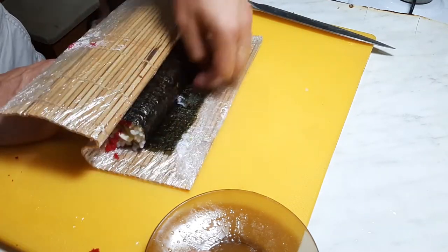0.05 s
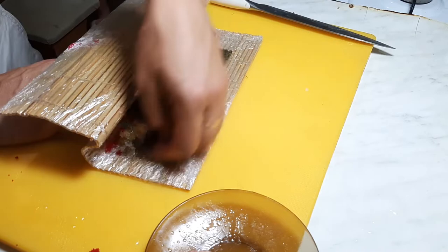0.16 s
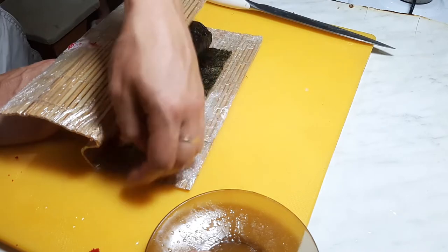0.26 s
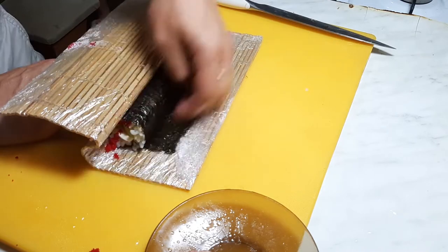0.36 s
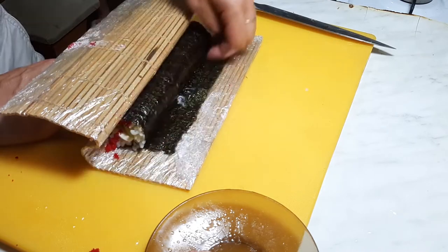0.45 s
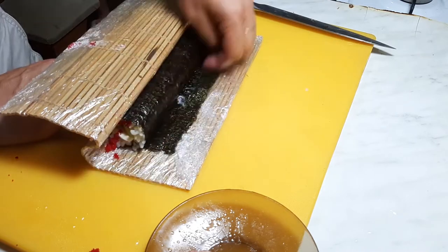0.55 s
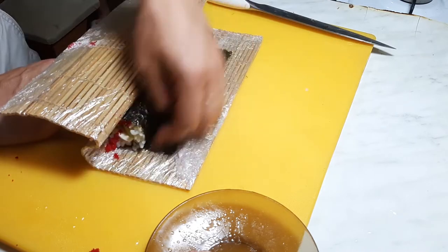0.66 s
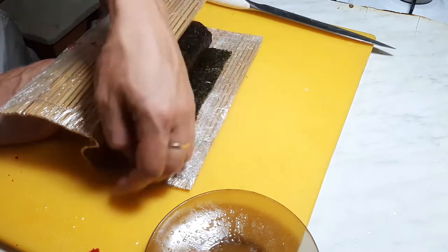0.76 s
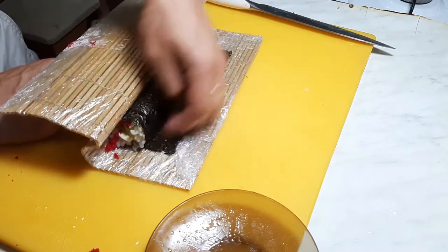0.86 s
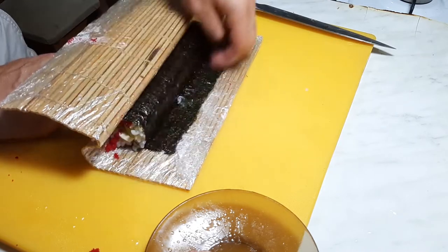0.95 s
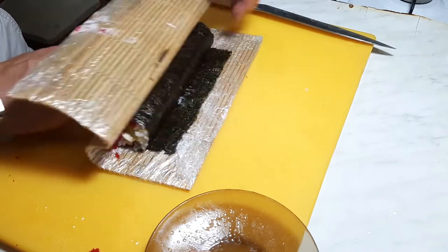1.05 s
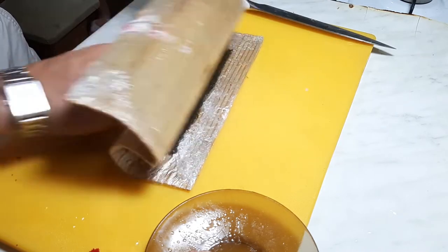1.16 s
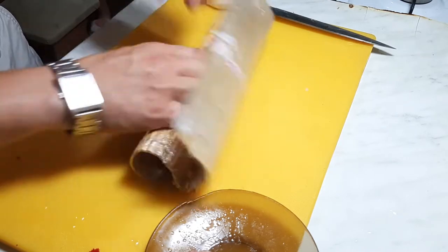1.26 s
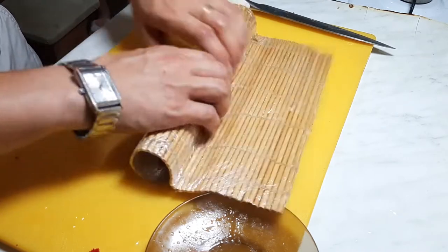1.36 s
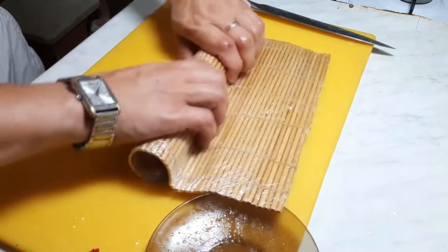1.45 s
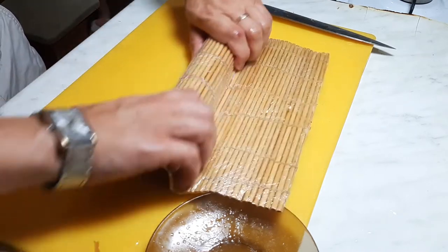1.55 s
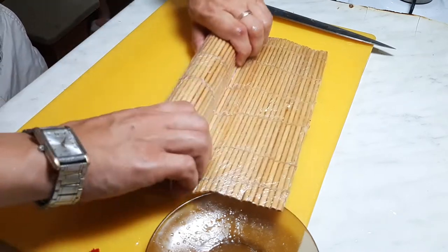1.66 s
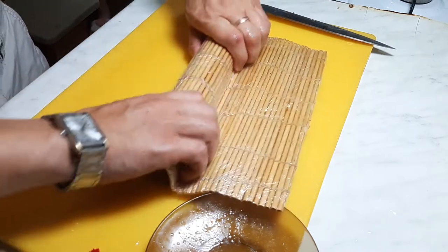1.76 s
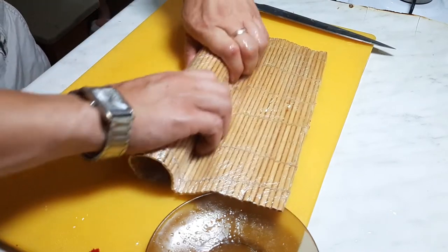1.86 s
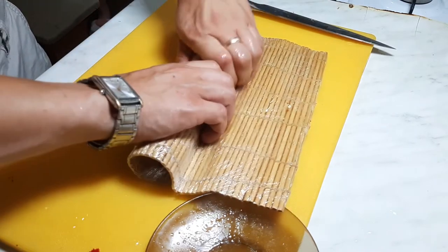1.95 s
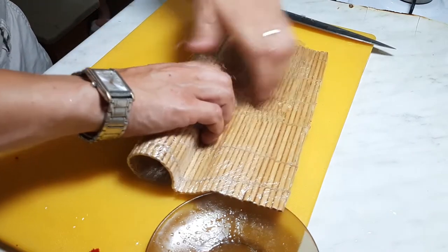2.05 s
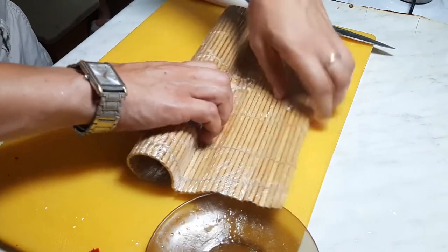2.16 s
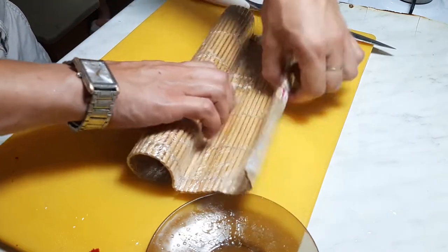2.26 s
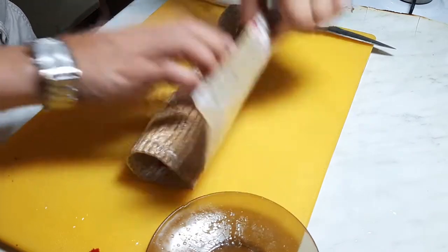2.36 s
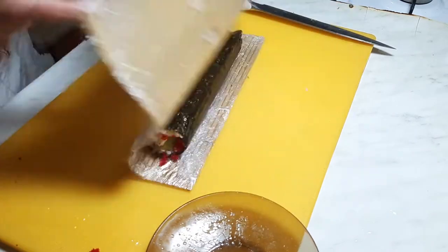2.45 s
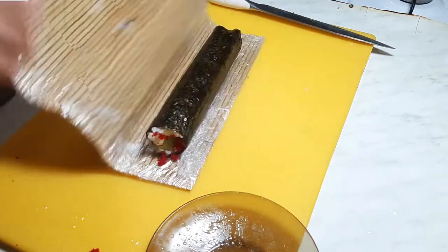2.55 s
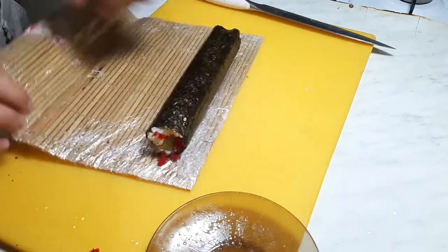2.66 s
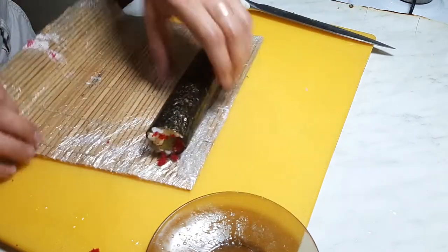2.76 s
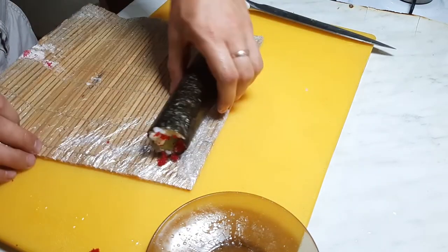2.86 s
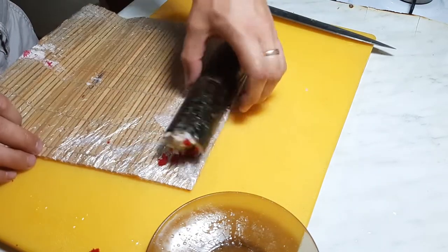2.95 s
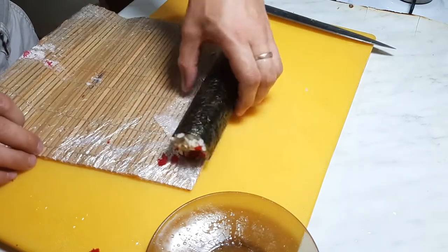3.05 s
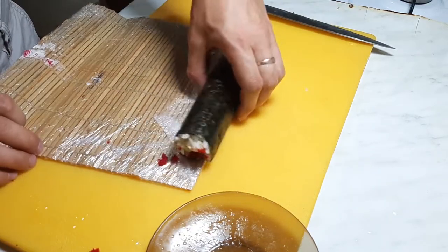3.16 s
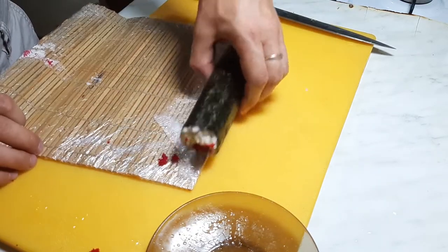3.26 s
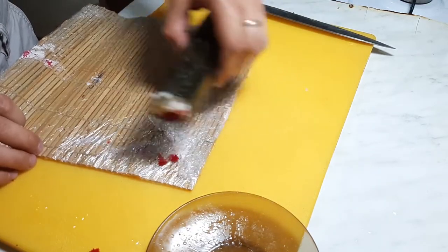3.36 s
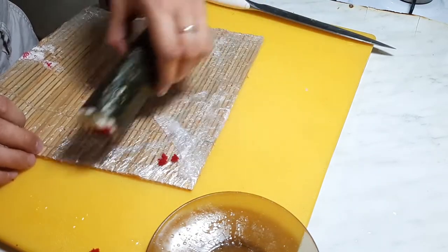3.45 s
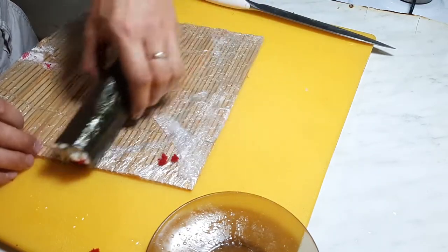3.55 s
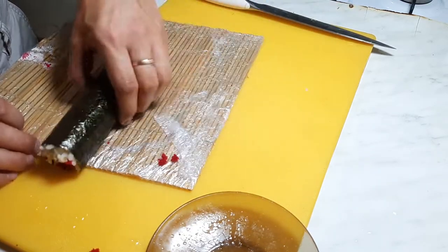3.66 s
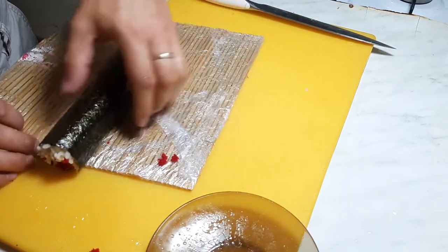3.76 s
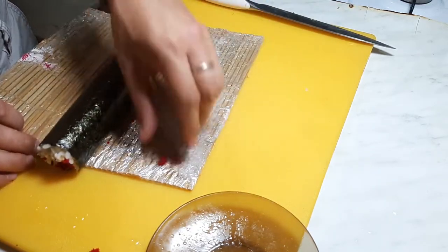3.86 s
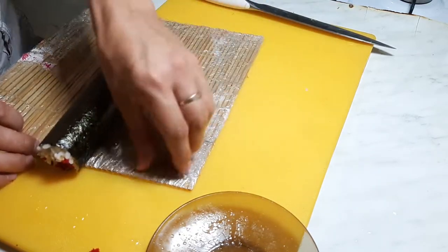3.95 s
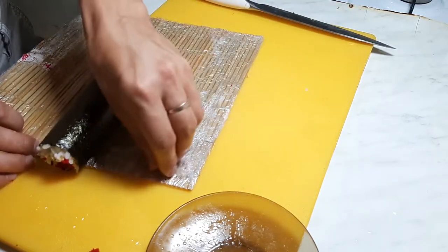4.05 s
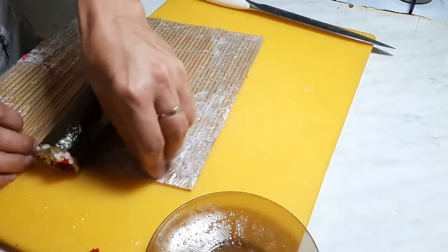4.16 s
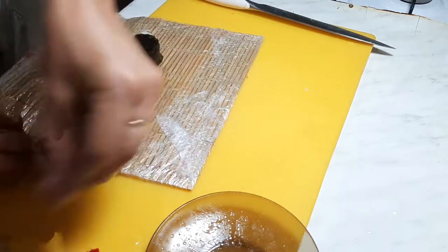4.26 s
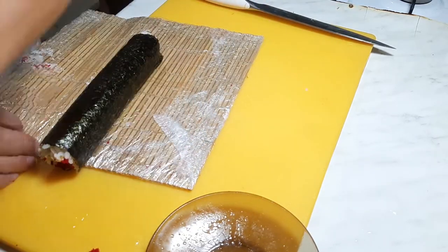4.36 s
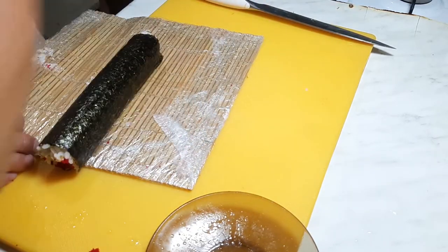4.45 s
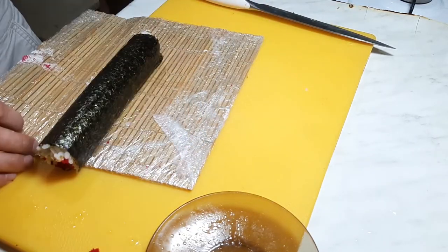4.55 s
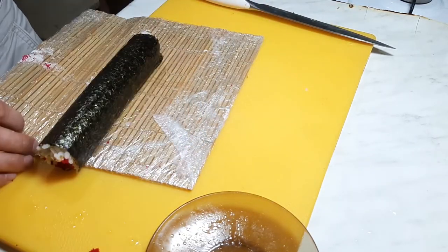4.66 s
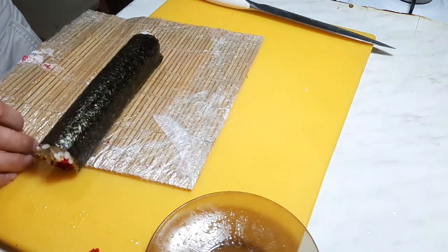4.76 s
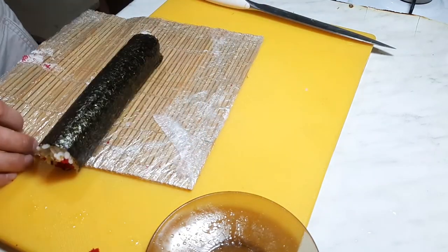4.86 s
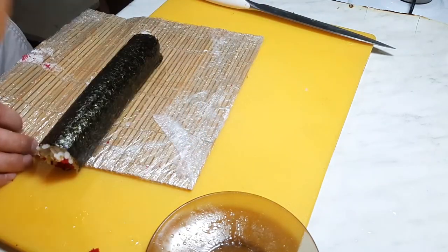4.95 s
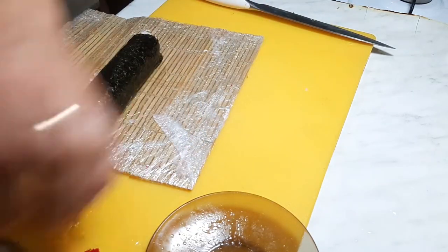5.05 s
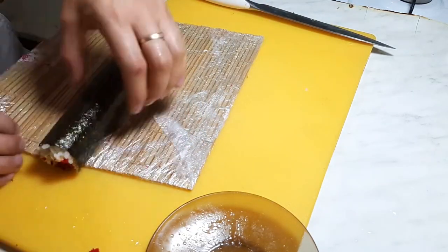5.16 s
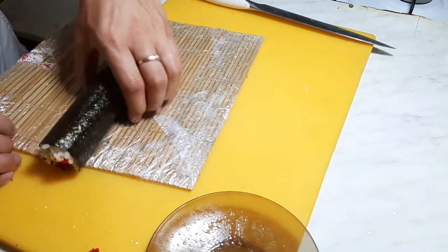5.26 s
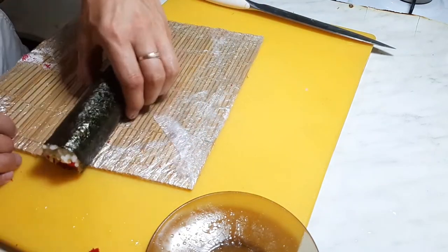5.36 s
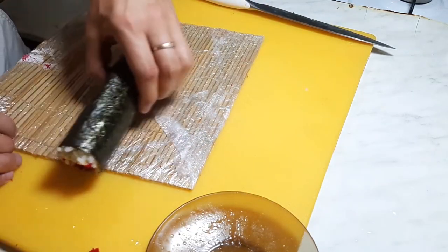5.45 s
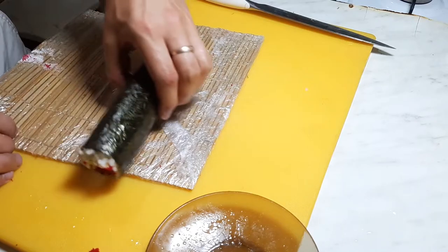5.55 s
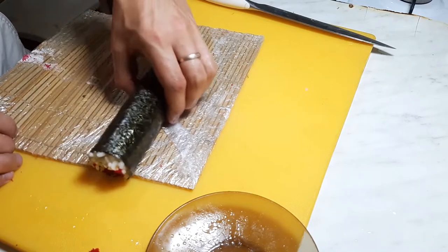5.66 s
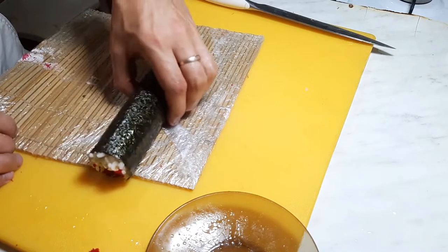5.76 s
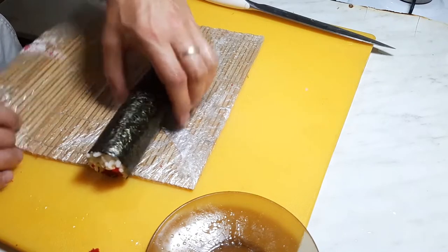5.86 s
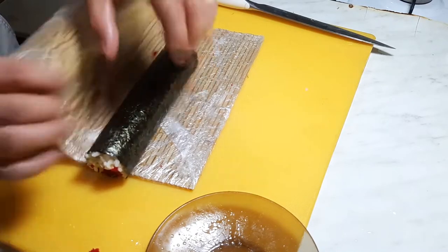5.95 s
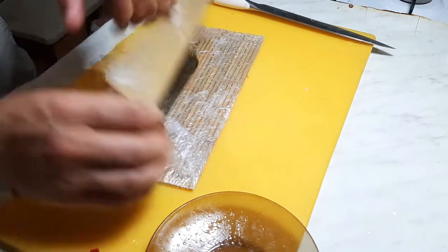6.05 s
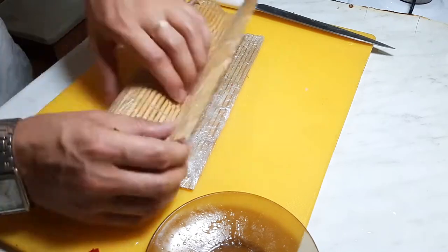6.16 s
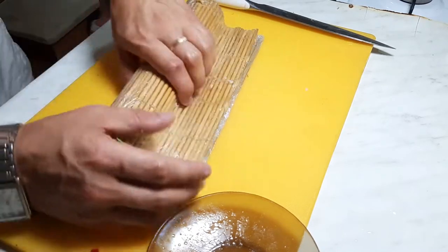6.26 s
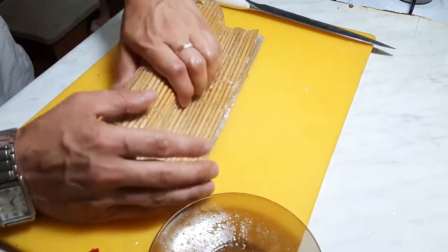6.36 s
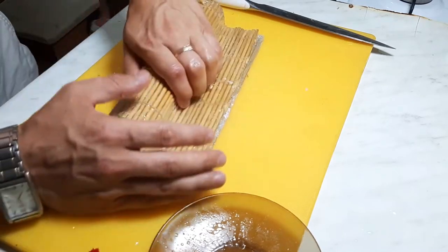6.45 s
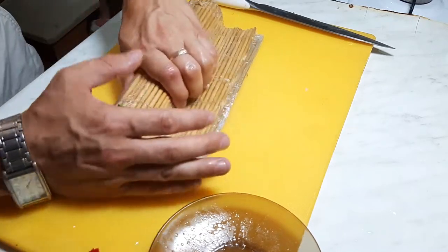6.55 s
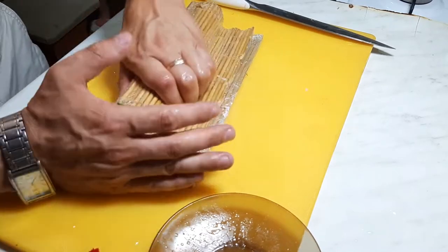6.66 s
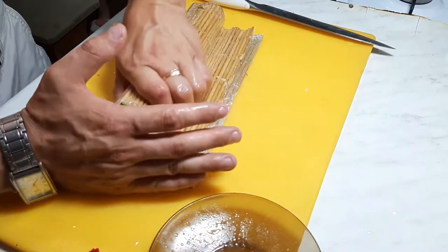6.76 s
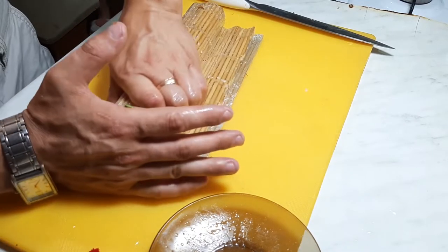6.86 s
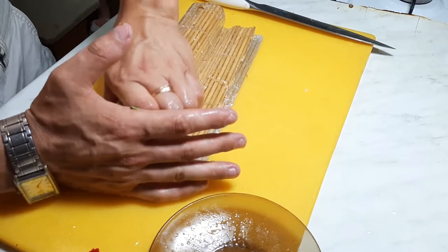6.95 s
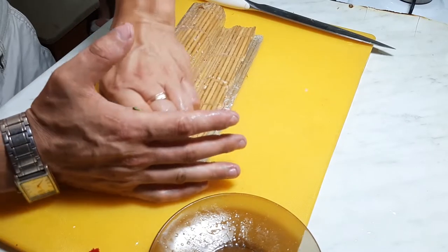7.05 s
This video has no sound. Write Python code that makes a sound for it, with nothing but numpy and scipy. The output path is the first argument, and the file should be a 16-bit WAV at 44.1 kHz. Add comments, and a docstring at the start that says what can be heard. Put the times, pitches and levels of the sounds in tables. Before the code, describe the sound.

A close stereo microphone in a small kitchen, with a faint fridge hum and thin air noise throughout. From 0 to 0.95 seconds a wet fingertip wipes dry seaweed in four quick, bright, grainy rasps, with sharp snaps near 0.28 and 0.6. Around 1.1 the film-wrapped bamboo mat folds with a thinner crinkle; at 1.24 to 1.33 a knife ticks lightly, then clinks hard with short damped ringing over a soft thud. Pressing rustles continue from 1.5 to 2. At 2.1 a dull double thump lands, then at 2.2 a loud slat clack on the plastic board, followed by crackling as the mat flings open until 2.6. From 2.7 to 5.9 only soft brushes and tiny bumps are heard, with small touches near 3.2, 4.5 and 5.3. Mat rustling returns at 6, a crisp double snap strikes at 6.24, and faint squeezing creaks of film fade towards 7.

```python
"""A wet fingertip wipes the dry seaweed edge of a sushi roll, close to the microphone: clumped stick-slip grains.
The film-wrapped bamboo mat is folded, pressed and flung open, then the roll is turned: grains rasp, creases snap.
Hands, mat and roll land on a plastic board, as struck modes with a dull push and a clatter of slats.
The mat jostles a steel knife into ticks and damped ringing. Behind it all, fridge tones hum over faint air noise."""
import sys
import numpy as np
from scipy import signal
from scipy.fft import rfft, irfft
from scipy.io import wavfile

SR = 44100
rng = np.random.default_rng(int(sys.argv[2]) if len(sys.argv) > 2 else 0)


def transcribe(u):
    """Save the signal u as a 16-bit wav file named by the first command-line argument.

    u: samples, shape (n,) or (channels, n), limited to [-1, 1]; the rate is SR.
    q: integer samples, one column per channel.
    """
    v = np.clip(np.atleast_2d(u).T, -1, 1)
    q = np.round(v * 32767).astype(np.int16)
    wavfile.write(sys.argv[1], SR, q)


N = 313110
TIME = np.arange(N) / SR

# In the event and mode tables, levels are balances that the layers trim further.
# Movements: start_s is the moment of full pressure.
# fingertip wipes along the seaweed: start_s, swell_s, hold_s, rasp_db
WIPES = [(0.0, .05, 0.1, -43), (0.285, 0.043, 0.075, -42), (0.552, 0.066, 0.068, -45),
         (.845, 0.098, 0.043, -46)]
# mat folded, pressed, flung open, squeezed again: start_s, swell_s, hold_s, crinkle_db, slat_rub_db
MAT_MOVES = [(1.085, 0.071, 0.27, -55, -73), (1.232, .012, 0.053, -60, -64),
             (1.485, 0.11, 0.036, -50, -61.5), (1.59, 0.056, 0.38, -61.5, -72),
             (1.752, .11, 0.076, -58, -64), (1.99, 0.024, 0.0069, -53.5, -61.5),
             (2.12, .02, 0.031, -50, -60.5), (2.243, 0.069, 0.16, -46, -57.5),
             (2.471, 0.027, .025, -51.5, -63), (2.548, .02, .02, -53, -63.5),
             (5.995, 0.059, 0.072, -62.5, -74.5), (6.107, 0.017, 0.074, -55.5, -64.5),
             (6.33, 0.097, 0.69, -60.5, -77), (6.47, 0.027, 0.026, -58, -69)]
# roll lifted, turned and brushed over the film: start_s, swell_s, hold_s, rasp_db
ROLL_MOVES = [(2.677, 0.054, 0.11, -66.5), (2.862, 0.075, 0.03, -55), (2.94, 0.047, .012, -58),
              (3.119, 0.062, 0.049, -64.5), (3.188, 0.022, 0.0042, -52), (3.609, 0.066, 0.033, -64),
              (3.891, .02, 0.091, -66), (4.131, 0.072, .015, -66.5), (4.731, 0.016, .004, -62.5),
              (4.774, .02, 0.0036, -60), (4.944, 0.046, 0.57, -73.5), (5.279, 0.061, 0.0067, -58.5),
              (5.324, 0.014, 0.0038, -50), (5.555, 0.0059, 0.012, -58), (5.793, 0.057, 0.13, -63.5)]
WIPE_RELEASE_S, MAT_RELEASE_S, ROLL_RELEASE_S = 0.077, 0.085, 0.057
WIPE_RUB_DB = -61.5   # every wipe rubs the board equally hard
ROLL_RUB_DB = -16.5   # relative to the roll's rasp
# a stroke drops by the depth over one swell or release time, on rounded slopes, and eases while held
STROKE_DEPTH_DB, STROKE_CURVE, SAG_DB_PER_S = 18.5, 1.144, 2.5

# Tone colours, as relative power density: pitch_hz, level_db (per Hz)
# seaweed under the fingertip
SEAWEED = [(1200, -26.5), (2150, -14.5), (2750, -1.5), (4000, -2), (5500, -2.5), (7000, -8.5), (9500, -12),
           (11500, -22), (16000, -18.5)]
# crinkling film
FILM = [(1200, -21.5), (2000, -18), (2700, -3), (5000, -1), (7000, -5), (9500, -8.5), (11500, -15.5),
        (16000, -9.5)]
# the roll's seaweed skin brushing over the film
BRUSH = [(1200, -33), (2200, -14), (3200, -5.5), (5000, 1.5), (7000, -4), (9500, -7.5), (11500, -16),
         (16000, -10.5)]
# dull rubbing on the board
RUB = [(40, -33.5), (70, -16), (110, 3.5), (180, 7), (300, -5.5), (580, -10), (820, 1), (1050, -3),
       (1400, 1), (2000, -5), (3200, -2.5), (8000, -46)]
# dull push of soft rice and flesh
PUFF = [(40, -52), (75, -16), (110, -4.5), (150, 5), (230, 6), (400, -8.5), (520, -16), (1000, -22.5),
        (3000, -42.5)]
# clatter of the slats
CLACK = [(40, -31), (100, -15), (300, -3), (600, -4.5), (1050, 4), (1650, -6), (2500, -2), (3800, -9),
         (5000, -14), (9000, -32.5), (16000, -36.5)]
# hard contact on the knife
STEEL_TICK = [(300, -24), (1500, -22), (2500, -9.5), (4000, 3), (5600, -4), (6800, 2.5), (8000, -15.5),
              (9600, -10.5), (11000, -23.5), (16000, -19.5)]
# room noise
AIR = [(25, -22.5), (50, -5), (90, -1.5), (170, 0.5), (260, -6.5), (420, -11.5), (800, -10.5), (1350, -8.5),
       (1900, -20), (3500, -19), (6000, -14), (12000, -24.5), (13200, -7), (14200, -21.5)]

# sharpest snaps of seaweed and film: start_s, level_db, fade_s, pitch_hz (band centre)
SNAPS = [(.253, -41, .0045, 4500), (.2742, -30.5, 0.0021, 6400), (.2853, -20.5, 0.0023, 3630),
         (.5455, -30.5, 0.00067, 4500), (.626, -32, 0.0024, 6100), (.745, -51, 0.011, 5750),
         (1.7934, -39.5, .0015, 4700), (1.916, -48.5, .007, 9310), (2.257, -34, 0.012, 4600),
         (2.2658, -32.5, 0.0028, 4400), (2.307, -35.5, 0.0045, 3920), (2.4737, -45, .004, 7200),
         (2.5692, -36.5, 0.017, 4400), (4.3865, -42, .00062, 6690), (4.512, -48.5, 0.011, 10060),
         (4.517, -47, 0.027, 5500), (5.554, -55, .007, 9500), (6.1076, -46.5, 0.0057, 2640),
         (6.2355, -26.5, 0.0074, 4170), (6.24, -25, 0.0017, 4730), (6.4738, -46, 0.0053, 5560),
         (6.5357, -42.5, 0.0027, 4280), (6.597, -44.5, .004, 6400), (6.666, -43.5, .002, 8550)]
# lesser creases: level relative to the rasp, random spreads either way
CREASES_PER_S, CREASE_DB, CREASE_SPREAD_DB = 16, 0.5, 4
CREASE_FADE_S, CREASE_HZ, CREASE_SPREAD_OCTAVES = 0.0016, 5200, .35

# mat and roll land, then their weight follows:
# start_s, thud_db, contact_s, clack_db, delay_s, second_thud_db, second_clack_db
LANDINGS = [(1.3092, -40.5, 0.0014, -41, .012, -32, -37), (2.1058, -33.5, 0.0021, -48, .0115, -26, -46),
            (2.195, -27, .0007, -17.5, .0045, -28.5, -24.5),
            (2.5688, -46.5, 0.0035, -36.5, 0.0095, -38.5, -37), (4.513, -39, 0.002, -63, .0095, -52, -45.5),
            (6.24, -50.5, .0035, -44, .01, -60, -55)]
# hands bump the board softly: start_s, thud_db, clack_db
BUMPS = [(.89, -47, -56), (1.247, -48, -59), (2.762, -56.5, -80), (4.74, -53.5, -78), (5.089, -59, -66.5),
         (5.204, -55, -65), (5.861, -64.5, -62.5), (6.016, -56, -67.5), (6.105, -64, -46.5),
         (6.171, -51.5, -63), (6.847, -53, -65), (7.088, -66, -60)]
BUMP_CONTACT_S = .0032
SETTLE_SHARE = .36   # second contact time as a share of the delay: later weight lands softer
# modes of the board on the counter: pitch_hz, level_db, t60_s
BOARD = [(98, -12, .18), (132, -8, .16), (153, 0, .2), (185, -9, .12), (216, -6, .15), (256, -8, .15),
         (321, -8, .17), (419, -9, .15), (470, -9, .1), (521, -3, .18), (703, -14, .15), (788, -8, .16),
         (1031, -5, .12), (1109, -7, .17), (1477, -14, .15), (1891, -11, .17), (2383, -12, .15),
         (2872, -11, .16)]

# touches on the knife: start_s, level_db
CLINKS = [(1.2388, -49), (1.2564, -45), (1.266, -41.5), (1.2811, -34.5), (1.3086, -17), (1.3197, -28.5),
          (1.3247, -31), (2.1033, -42), (2.1157, -39)]
# modes of the steel blade: pitch_hz, level_db, t60_s
BLADE = [(1900, -13, .14), (3155, -12, .07), (3920, -1, .11), (4111, -9, .07), (4232, -9, .07),
         (4595, -4, .09), (4768, -11, .09), (6333, -6, .1), (6467, 1, .1), (6539, -8, .08), (6613, -7, .09),
         (6743, -9, .08), (6931, -8, .08), (7111, -14, .09), (8880, -15, .12), (9564, -12, .14),
         (12180, -20, .05)]

# fridge compressor and its whine: pitch_hz, level_db (rms at the microphone)
FRIDGE = [(66.7, -75.5), (88.6, -91), (133.6, -77), (200, -77.5), (1000, -82), (1133.5, -91), (1400, -94),
          (1466.8, -87.5)]
AIR_DB = -70
KITCHEN_T60_S = 0.31

# left minus right sensitivity of the two microphone ports: pitch_hz, level_db
PORTS = [(60, -2), (300, -3), (700, -2.5), (1300, 3.5), (2400, -3.5), (4400, -6), (7500, -6.5), (9000, -14),
         (10200, -15), (12000, -8.5), (15000, -13)]
# how alike the two ports hear diffuse sound: pitch_hz, correlation (no unit)
LIKENESS = [(100, 0.9), (300, 0.46), (600, 0.3), (1200, 0.2), (3000, 0.082), (16000, 0.025)]
CUTOFF_HZ = 16000


def from_db(db):
    """Decibels to an amplitude factor."""
    return 10 ** (np.asarray(db) / 20)


def rms_one(x):
    """Scale a sound to an rms of one."""
    return x / np.sqrt(np.mean(x ** 2) + 1e-20)


def at_hz(points, hz):
    """Read a table on a log-frequency axis."""
    knots, values = np.transpose(points)
    return np.interp(np.log(hz + 1), np.log(knots), values)


def add(track, s, sound):
    """Mix a sound into a track at time s."""
    start = int(s * SR)
    track[..., start:start + sound.shape[-1]] += sound[..., :N - start]


def convolve(x, response):
    """Filter each channel, keeping the original length."""
    return signal.oaconvolve(np.atleast_2d(x), np.atleast_2d(response), axes=-1)[:, :x.shape[-1]]


def butter(x, order, hz, kind):
    """Run a sound through a Butterworth filter."""
    return signal.sosfilt(signal.butter(order, hz, kind, fs=SR, output="sos"), x)


def causal(gain_at, size=4096):
    """Minimum-phase impulse response of a gain that depends on frequency."""
    cepstrum = irfft(np.log(gain_at(np.fft.rfftfreq(size, 1 / SR)) + 1e-9))
    # fold the cepstrum forward in time
    cepstrum[1:size // 2] *= 2
    cepstrum[size // 2 + 1:] = 0
    return irfft(np.exp(rfft(cepstrum)))


def colour(x, spectrum):
    """Shape a white signal without changing its power."""
    response = causal(lambda hz: from_db(at_hz(spectrum, hz)))
    return convolve(x, response / np.linalg.norm(response))


def diffuse(pair):
    """Two unrelated signals become what two close ports hear: most alike in the bass."""
    mid = convolve(pair[0], causal(lambda hz: np.sqrt(1 + at_hz(LIKENESS, hz))))
    side = convolve(pair[1], causal(lambda hz: np.sqrt(1 - at_hz(LIKENESS, hz))))
    return np.vstack([mid + side, mid - side]) / np.sqrt(2)


def kitchen(x, early_db, tail_db, early_s=0.014):
    """Direct sound, quick reflections from counter and cupboards, and a short tail."""
    t = TIME[:SR // 2]
    early_fade = np.exp(-t / early_s) * (t > .002)
    tail_fade = np.exp(-np.log(1000) * t / KITCHEN_T60_S) * (t > .008)
    early = rms_one(rng.standard_normal((2, len(t))) * early_fade)
    tail = rms_one(rng.standard_normal((2, len(t))) * tail_fade)
    echoes = diffuse(from_db(early_db) * early + from_db(tail_db) * tail) / np.sqrt(len(t))
    return x + convolve(x, echoes)


def burst(fade_s):
    """A contact: one sharp impact, then a dense spray of tiny ones that dies away."""
    t = TIME[:SR // 8]
    spray = rng.standard_normal((2, len(t))) * np.exp(-t / fade_s)
    spray[:, 0] = 1.6
    unit_energy = spray / np.linalg.norm(spray, axis=1, keepdims=True)
    return unit_energy * np.sqrt(fade_s * SR / 2)


def ring(modes, scatter_db, signs=1):
    """One blow on a body: every mode rings with a strength of its own."""
    hz, db, t60 = np.transpose(modes)
    t = TIME[:SR // 3, None]
    strength = signs * from_db(db + scatter_db * rng.standard_normal(len(hz)))
    fade = np.exp(-np.log(1000) * t / t60)
    return (fade * np.sin(2 * np.pi * hz * t)) @ strength


def stroke(s, swell_s, hold_s, release_s):
    """Gain of one movement: the pressure builds, eases slowly while it is held, and lets go."""
    before = np.maximum((s - TIME) / swell_s, 0)
    after = np.maximum((TIME - s - hold_s) / release_s, 0)
    away = before + after
    near = away < 5   # inaudible beyond
    slope_db = STROKE_DEPTH_DB * away[near] ** STROKE_CURVE
    sag_db = SAG_DB_PER_S * np.maximum(TIME[near] - s, 0)
    gain = np.zeros(N)
    gain[near] = from_db(-slope_db - sag_db)
    return gain


def together(gains):
    """Overlapping movements add in power."""
    return np.sqrt(sum(gain ** 2 for gain in gains))


def grains(per_s, spread_db, hiss, clump_db=1.5, clump_s=0.0036):
    """Stick-slip: clicks of uneven size over a smooth hiss, bunching as the surfaces catch and let go."""
    sizes = from_db(spread_db * np.minimum(rng.exponential(1, N), 3))
    clicks = (rng.random(N) < per_s / SR) * sizes * rng.choice([-1, 1], (2, N))
    grip = np.interp(TIME / clump_s, np.arange(N), np.clip(rng.standard_normal(N), -2, 2))
    grainy = rms_one(clicks) + hiss * rng.standard_normal((2, N))
    return rms_one(grainy * from_db(clump_db * grip))


def friction(rasp, rub, spectrum, texture, rasp_db, rub_db, light_db=-63, light_hz=4200):
    """A surface rasps under the hand while the same motion rubs dully on the board."""
    rasping = colour(texture * rasp, spectrum)
    # a light touch catches only the finest ridges, so it sounds thinner
    lightness = 1 / (1 + (rasp / from_db(light_db)) ** 2)
    coarse = butter(rasping, 1, light_hz, "low")
    bright = (rasping - lightness * coarse) * from_db(1.8 * lightness)
    dull = colour(diffuse(grains(per_s=980, spread_db=3.5, hiss=0.49)) * rub, RUB)
    return from_db(rasp_db) * bright + from_db(rub_db) * dull


def wiping():
    """A wet fingertip catches and slips along dry seaweed: its friction sound and rasp strength."""
    strokes = [(stroke(s, swell_s, hold_s, WIPE_RELEASE_S), db) for s, swell_s, hold_s, db in WIPES]
    rasp = together(gain * from_db(db) for gain, db in strokes)
    rub = together(gain for gain, _ in strokes) * from_db(WIPE_RUB_DB)
    texture = grains(per_s=3000, spread_db=3.0, hiss=0.61, clump_db=1.2)
    return friction(rasp, rub, SEAWEED, texture, rasp_db=1.0, rub_db=3.5), rasp


def handling():
    """Film crinkles and slats rub as the mat moves: the friction sound and crinkle strength."""
    moves = [(stroke(s, swell_s, hold_s, MAT_RELEASE_S), db, rub_db)
             for s, swell_s, hold_s, db, rub_db in MAT_MOVES]
    crinkle = together(gain * from_db(db) for gain, db, _ in moves)
    rub = together(gain * from_db(rub_db) for gain, _, rub_db in moves)
    texture = grains(per_s=1200, spread_db=0.0, hiss=0.72, clump_db=2.0)
    return friction(crinkle, rub, FILM, texture, rasp_db=0.0, rub_db=4.0, light_db=-61.5), crinkle


def turning():
    """The roll's skin brushes over film and rubs on the board: the friction sound and rasp strength."""
    rasp = together(stroke(s, swell_s, hold_s, ROLL_RELEASE_S) * from_db(db)
                    for s, swell_s, hold_s, db in ROLL_MOVES)
    rub = rasp * from_db(ROLL_RUB_DB)
    texture = grains(per_s=1200, spread_db=2.0, hiss=1.0, clump_db=2.9)
    sound = friction(rasp, rub, BRUSH, texture, rasp_db=0.0, rub_db=2.5, light_db=-66.5, light_hz=5600)
    return sound, rasp


def creases(rasp):
    """Small snaps at random moments, scaled by the movement that causes them: rows like SNAPS."""
    wait, size, pitch = rng.random((400, 3)).T
    times = np.cumsum(-np.log(1 - wait)) / CREASES_PER_S
    rasp_db = 20 * np.log10(np.interp(times, TIME, rasp) + 1e-9)
    db = rasp_db + CREASE_DB + CREASE_SPREAD_DB * (2 * size - 1)
    hz = CREASE_HZ * 2 ** (CREASE_SPREAD_OCTAVES * (2 * pitch - 1))
    return [(s, level, CREASE_FADE_S, centre) for s, level, centre in zip(times, db, hz) if s < TIME[-1]]


def snaps(rows, level_db=-3.0):
    """Creases buckle, each in an octave-wide band around its own pitch."""
    out = np.zeros((2, N))
    for s, db, fade_s, hz in rows:
        response = butter(signal.unit_impulse(256), 1, hz * np.sqrt([.5, 2]), "band")
        snap = convolve(burst(fade_s), response / np.linalg.norm(response))
        add(out, s, from_db(db + level_db) * snap)
    return butter(out, 3, 2200, "high")


def blows():
    """A landing strikes twice, a bump once: rows of start_s, thud_db, contact_s, clack_db."""
    rows = []
    for s, db, contact_s, clack_db, delay_s, second_db, second_clack_db in LANDINGS:
        rows.append((s, db, contact_s, clack_db))
        rows.append((s + delay_s, second_db, SETTLE_SHARE * delay_s, second_clack_db))
    return rows + [(s, db, BUMP_CONTACT_S, clack_db) for s, db, clack_db in BUMPS]


def knocks(clack_s=0.0053, thud_db=-4.5, clack_db=0.0, puff_s=0.027, puff_db=-8.5, radiates_hz=120):
    """A softer landing reaches only the board's low modes; rice and flesh push dully, slats clatter on top."""
    thuds, slats, puffs = np.zeros(N), np.zeros((2, N)), np.zeros((2, N))
    for s, db, contact_s, slats_db in blows():
        # a longer push on the board filters out its high modes
        force = np.sin(np.pi * np.minimum(TIME[:SR // 50] / contact_s, 1)) ** 2
        thud = signal.fftconvolve(ring(BOARD, scatter_db=4.0), force / force.sum())
        add(thuds, s, from_db(db + thud_db) * thud)
        add(puffs, s, from_db(db + puff_db) * burst(puff_s))
        add(slats, s, from_db(slats_db + clack_db) * burst(clack_s))
    # the board is too small to radiate deep bass
    thuds = butter(thuds + 1e-18, 4, radiates_hz, "high")
    loose = colour(diffuse(puffs), PUFF) + colour(diffuse(slats), CLACK)
    return kitchen(thuds, early_db=-18, tail_db=-17.5) + kitchen(loose, early_db=-8.5, tail_db=-7.5)


def knife(tick_s=0.0032, tick_db=2.5, ring_db=-7.0):
    """The knife is nudged, drops back and bounces: hard ticks and a damped ring."""
    blade, ticks = np.zeros((2, N)), np.zeros((2, N))
    lobes = rng.choice([-1, 1], (2, len(BLADE)))   # each port faces other lobes of the bending blade
    for s, db in CLINKS:
        ringing = np.array([ring(BLADE, scatter_db=0.5, signs=port) for port in lobes])
        add(blade, s, from_db(db + ring_db) * ringing)
        add(ticks, s, from_db(db + tick_db) * burst(tick_s))
    ticks = colour(ticks, STEEL_TICK)
    return kitchen(blade, early_db=-14.5, tail_db=-17.5) + kitchen(ticks, early_db=-9.0, tail_db=-14.5)


def background():
    """The fridge's steady sine tones over faint, diffuse room noise."""
    hum = np.zeros(N)
    for hz, db in FRIDGE:
        hum += from_db(db) * np.sqrt(2) * np.sin(2 * np.pi * (hz * TIME + rng.random()))
    air = colour(diffuse(rng.standard_normal((2, N))), AIR)
    return hum + from_db(AIR_DB) * air


def scene():
    """Seaweed, mat and roll in the kitchen, with knocks, knife and background."""
    wipe, rasp = wiping()
    mat, crinkle = handling()
    roll, brush = turning()
    rustle = kitchen(wipe + mat + roll, early_db=-6.5, tail_db=-11.5)
    all_snaps = list(SNAPS) + creases(rasp + crinkle + brush)
    crackle = kitchen(snaps(all_snaps), early_db=-5.5, tail_db=-10.5)
    return rustle + crackle + knocks() + knife() + background()


def record(dry):
    """The left port is shaded and mostly duller than the right; rumble and the top are cut."""
    # each port takes half of the difference
    ports = [causal(lambda hz: from_db(side * at_hz(PORTS, hz) / 2)) for side in (1, -1)]
    heard = butter(convolve(dry, np.array(ports)), 2, 45, "high")
    return convolve(heard, causal(lambda hz: 1 / np.sqrt(1 + (hz / CUTOFF_HZ) ** 200)))


dry = scene()
out = record(dry)
transcribe(out)
```